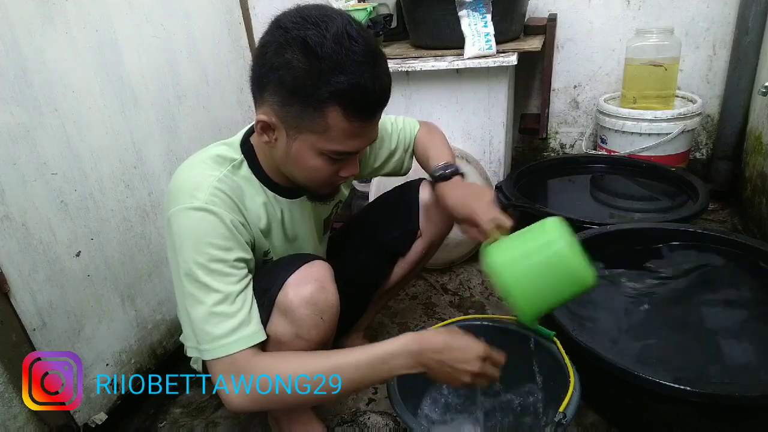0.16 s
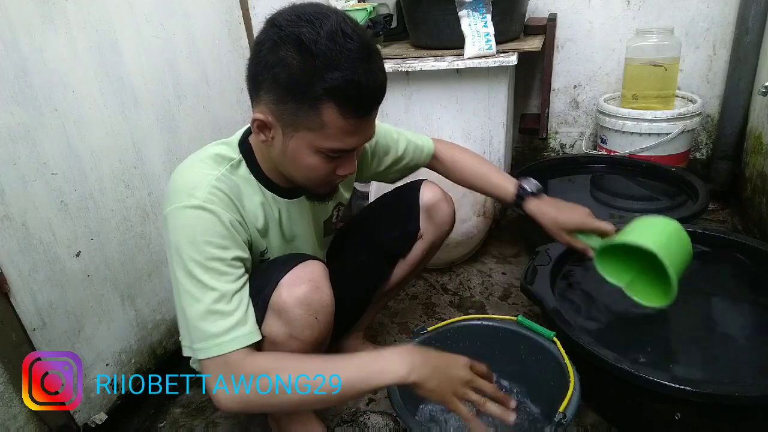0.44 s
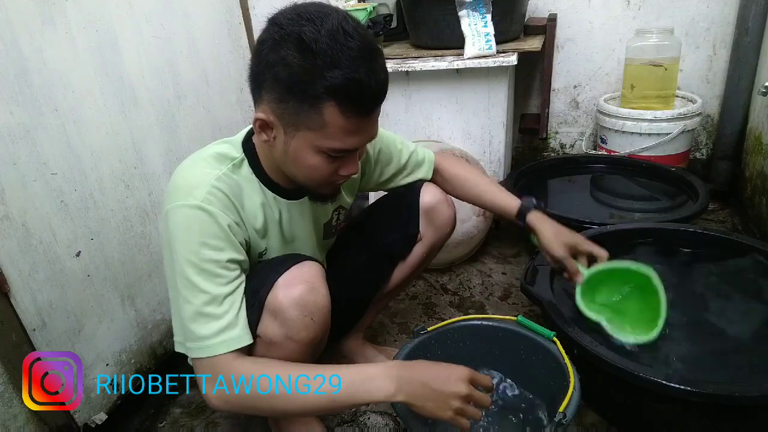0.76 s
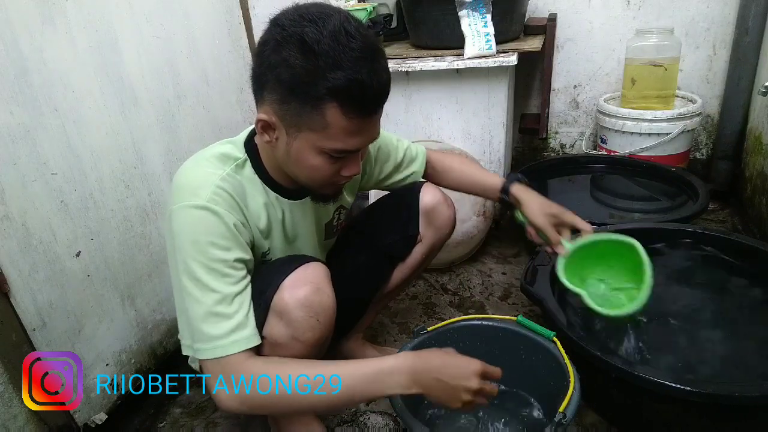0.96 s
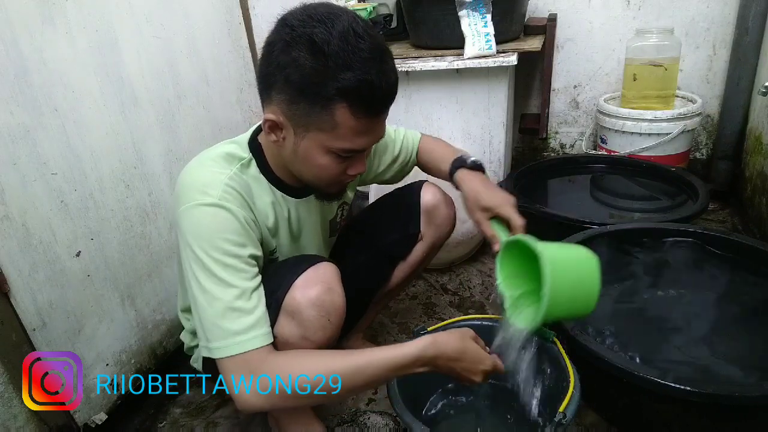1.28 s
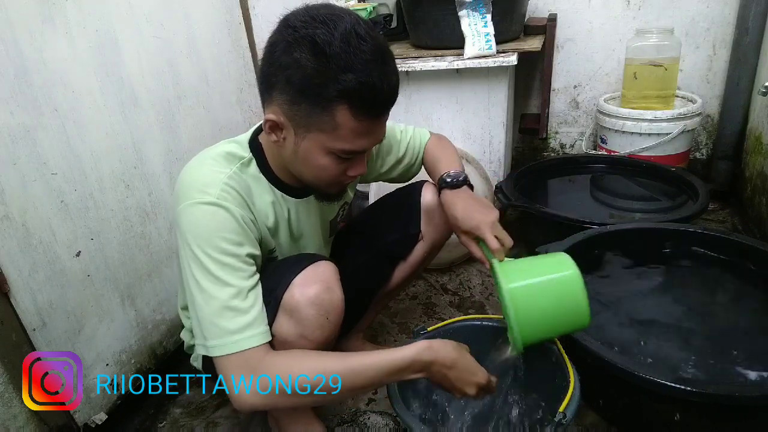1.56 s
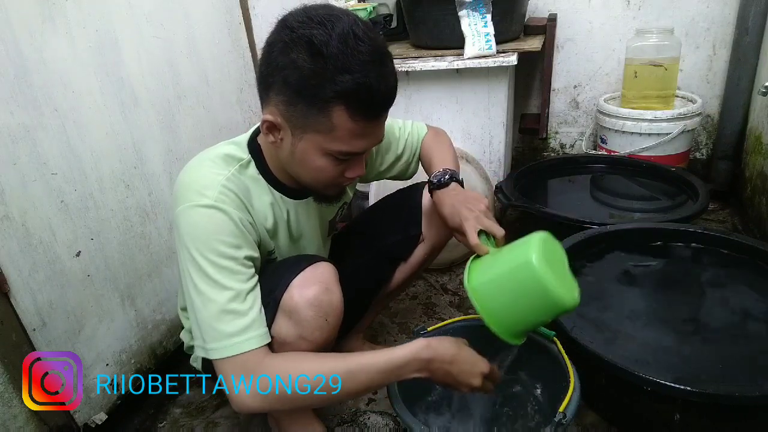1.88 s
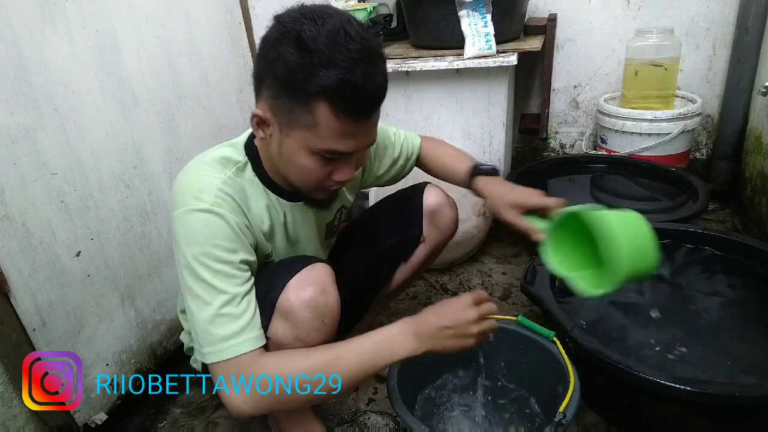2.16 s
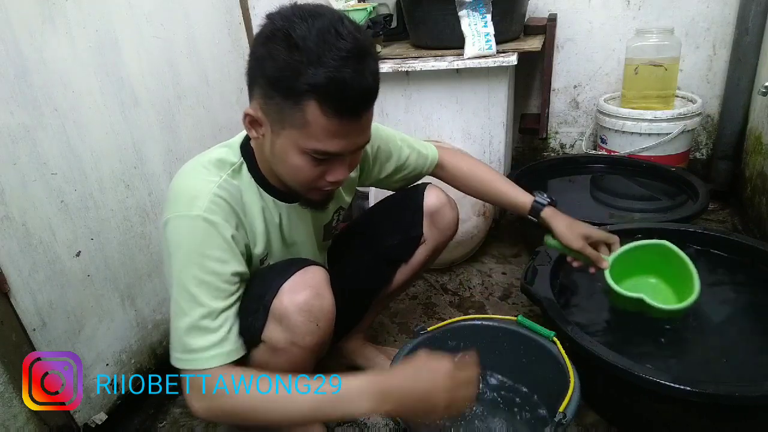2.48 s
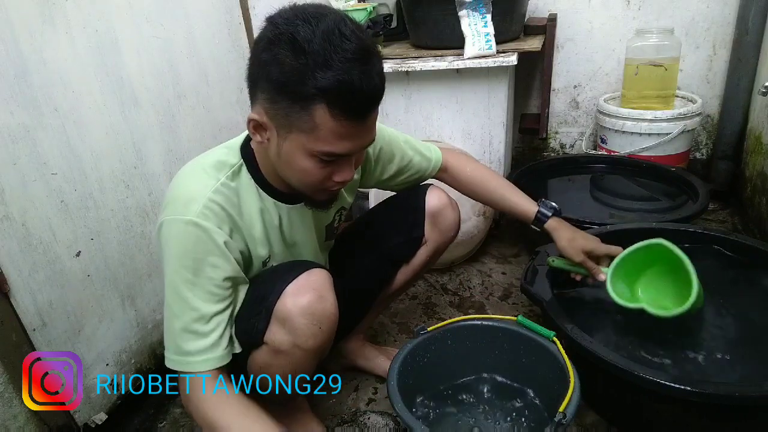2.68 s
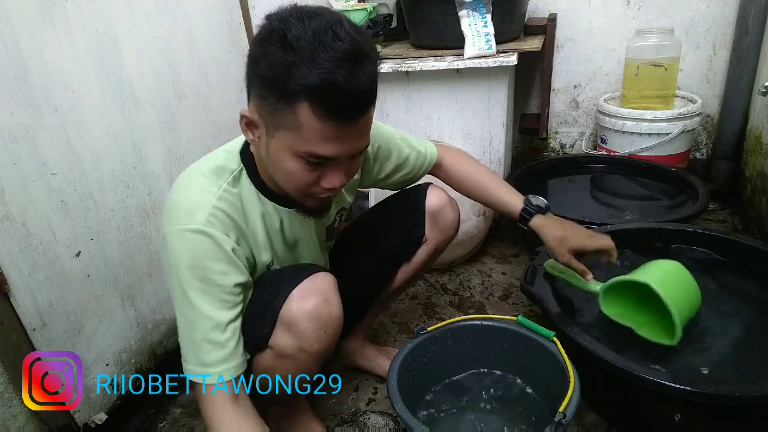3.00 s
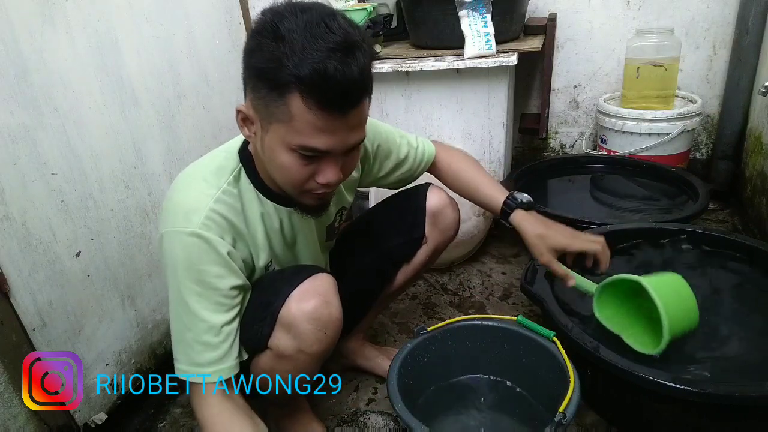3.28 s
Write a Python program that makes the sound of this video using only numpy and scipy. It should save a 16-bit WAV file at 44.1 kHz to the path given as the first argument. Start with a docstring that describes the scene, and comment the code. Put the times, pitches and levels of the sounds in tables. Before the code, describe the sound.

Water from a plastic dipper is already pouring into a bucket at 0 s, with a deep gurgle and splash fading by about 0.8 s. From 0.9 to 1.7 s come small splashes, plops and sharp plastic ticks. A second, slightly higher-pitched pour splashes from 1.8 to 2.6 s. Drips and clicks follow, then a loud click and hollow plop near 3.28 s. Close, short yard echoes, faint air and hum.

```python
"""A deep gurgle and splash open: a plastic dipper tips water into a bucket in a small walled yard.
A hand stirs and the dipper scoops from a large tub (splashes, plops, plastic ticks); a second pour follows.
At the end the dipper drops onto the tub water: a click and a loud hollow plop.
Water is a swarm of rising damped sines and clicks, plops are swelling sines with wall echoes,
ticks are noise cracks; all pass through the scattered echoes of the yard, over air noise and low hum."""
import sys
import numpy as np
from scipy import signal
from scipy.fft import rfft, irfft, next_fast_len
from scipy.io import wavfile

SR = 44100
rng = np.random.default_rng(int(sys.argv[2]) if len(sys.argv) > 2 else 0)


def master_out(mix):
    """Clip the mix to full scale and print it as 16-bit PCM to the path in sys.argv[1]."""
    frames = np.transpose(np.atleast_2d(mix))
    ceiling = np.clip(frames, -1, 1)
    pcm = np.round(ceiling * 32767).astype(np.int16)
    wavfile.write(sys.argv[1], SR, pcm)


N = 152145

# Parts of each pour: (time [s], gurgle level [dB], splash level [dB], spray level [dB])
POUR_ONE = [(0, -18.5, -27, -32), (.04, -31, -31.5, -42.5), (.25, -32, -32.5, -41), (.5, -35.5, -35.5, -42),
            (.58, -33.5, -38, -47), (.635, -55, -45, -43), (0.678, -50, -39.5, -42), (.74, -50, -49.5, -71),
            (.88, -74, -52.5, -55.5)]
POUR_TWO = [(1.805, -75, -73, -41.5), (1.83, -80, -37.5, -40), (1.885, -57, -29.5, -39.5),
            (1.97, -46, -30.5, -39.5), (2.03, -31.5, -31.5, -40), (2.1, -34.5, -35, -42),
            (2.39, -38.5, -37.5, -44.5), (2.53, -44, -39.5, -42.5), (2.62, -51, -50, -55),
            (2.78, -69, -52.5, -55)]
# Spectra of those parts: (frequency [Hz], relative density [dB per Hz])
GURGLE_SPECTRUM = [(100, -16), (160, -1.5), (300, -7), (405, 7), (560, -4.5), (780, -1.5), (1400, -13),
                   (2200, -11.5), (5000, -54)]
SPLASH_SPECTRUM = [(350, -9), (600, -12), (850, -6), (1500, 1.5), (2500, 4.5), (3400, 0), (5000, -8),
                   (7000, -18), (9000, -23), (14000, -36)]
SPRAY_SPECTRUM = [(3000, -24), (6500, -3.5), (8200, -10.5), (9700, 3.5), (12800, 5), (14000, -61)]
# Crisp drops: (frequency [Hz], relative density [dB per Hz])
SPATTER_SPECTRUM = [(500, -19), (1500, -9), (3000, 2), (5000, 16), (8000, -14), (10500, 11), (13500, -2)]
# Small splashes of hand and dipper:
# (time [s], level [dB], decay [s], centre [Hz], half-width near -6 dB [octaves])
SPLASHES = [(0.919, -36, 0.048, 2070, 1.02), (0.981, -38.5, 0.04, 2800, 0.77),
            (1.114, -41, 0.056, 2310, 1.14), (1.211, -38.5, 0.22, 1280, 0.75),
            (1.253, -24.5, 0.0056, 2090, 0.72), (1.302, -31, 0.036, 2430, 0.49),
            (1.343, -28, 0.011, 2200, 0.54), (1.405, -37.5, 0.12, 2190, 0.73), (1.42, -33, 0.074, 734, 0.3),
            (1.489, -37, 0.083, 2900, 0.99), (1.595, -42.5, 0.081, 990, 0.21),
            (1.66, -38.5, 0.024, 2310, 0.38), (1.817, -29, 0.015, 2550, 0.68),
            (1.998, -23.5, 0.037, 910, 0.49), (2.017, -26, 0.011, 1210, 1.1),
            (2.113, -26, 0.0092, 1800, 0.47), (2.405, -27, 0.01, 1700, 1.06),
            (2.514, -22, 0.0052, 2400, 0.73), (2.649, -30, 0.0086, 2210, 0.25),
            (2.79, -32.5, 0.019, 1710, 1.55), (3.08, -38, 0.015, 3720, 0.53),
            (3.153, -43, 0.0085, 5200, 0.15), (3.175, -36.5, 0.016, 850, 0.25),
            (3.237, -40.5, 0.034, 2030, 0.91), (3.284, -32.5, 0.012, 1120, 0.47)]
# Single ringing bubbles: (time [s], pitch [Hz], level [dB], decay [s])
BUBBLES = [(.012, 920, -35, 0.032), (.348, 695, -18, 0.0084), (0.711, 1032, -29, 0.024),
           (.738, 1046, -32, 0.0095), (0.765, 1600, -26, 0.0031), (0.919, 1750, -33, 0.0045),
           (1.255, 1960, -9.5, 0.0015), (1.305, 2725, -19, 0.0036), (1.348, 2520, -31, 0.0056),
           (1.4065, 5060, -22.5, 0.0024), (1.425, 990, -23.5, 0.0042), (1.44, 523, -25.5, 0.031),
           (1.453, 392, -30.5, 0.038), (1.445, 780, -31, 0.015), (1.491, 775, -22.5, 0.014),
           (1.505, 704, -34, 0.0087), (1.5515, 11950, -17.5, 0.0015), (1.5615, 12200, -32, 0.0013),
           (1.595, 943, -36, 0.032), (2.012, 753.6, -21.5, 0.03), (2.65, 1720, -37, 0.0039),
           (2.791, 1575, -31, .006)]
# Air trapped under the dipper: (time [s], pitch [Hz], level [dB])
PLOPS = [(.55, 436, -35), (0.641, 450, -35), (.978, 585, -46), (1.005, 593, -41.5), (1.11, 560, -31),
         (1.229, 627, -32), (1.393, 620, -32.5), (2.397, 455, -29), (2.651, 466, -40), (2.885, 668, -46),
         (2.945, 563, -46), (3.174, 500, -31), (3.284, 536, -12)]
# Walls round the tub: (delay [s], level against the first arrival [dB])
WALLS = [(.0083, 4), (.0185, 3), (.0222, 5.5), (.0365, -7), (.0497, -3), (.067, -14), (.084, -8.5),
         (.103, -10.5), (.143, -26)]
# Plastic dipper and drops:
# (time [s], level [dB], lower modes against top [dB], reverberation send [dB], time to peak [s])
TICKS = [(0.6736, -35, 11.5, -2.5, 0.00074), (0.9864, -29, -16, -3.5, 0.0014),
         (1.11, -44.5, 8.5, 1, 0.0011), (1.1249, -18.5, -16, -13, 0.001), (1.4059, -30, 9.5, -7, 0.0011),
         (1.5494, -21.5, -16, -14, .0007), (2.65, -30, -5, -14, 0.00068), (2.791, -31, -4, -9, 0.0015),
         (2.795, -15, -20, -17.5, 0.0012), (2.8857, -21.5, -1, -10.5, 0.00045),
         (3.2834, -6, -6, -9.5, 0.00089), (3.2877, -14, -12, -11, 0.00047)]
# Upper and lower modes of a tick: (frequency [Hz], relative density [dB per Hz])
TICK_TOP_SPECTRUM = [(4000, -4), (6300, -8), (8100, -11.5), (8800, -6), (9700, 8), (12600, 9.5),
                     (14000, -42)]
TICK_BODY_SPECTRUM = [(300, -5), (1000, -14), (2000, -3), (3700, 9.5), (5200, -1), (9000, -57)]
# Yard decay: (frequency [Hz], t60 [s])
YARD_T60 = [(200, 0.77), (1000, 0.13), (4000, 0.1763), (12000, .18)]
# Yard reverberation before each source's send: (frequency [Hz], gain [dB])
YARD_WET = [(150, -14.5), (500, -1), (1300, 5.5), (5000, 8.5), (12000, 8)]
# Outdoor air: (frequency [Hz], relative density [dB per Hz])
AIR_SPECTRUM = [(20, -36), (60, -2), (160, 3), (300, -2.5), (600, -9.5), (1200, -19.5), (2500, -17.5),
                (5000, -16.5), (8000, -30), (10500, -12.5), (13500, -25.5)]
# Hum bands: (centre [Hz], half-width at -6 dB [Hz], level before HUM_GAIN [dB])
HUM_BANDS = [(61, 10, -58), (94.3, 7.1, -58.5)]
# Wavering of the hum: (time [s], gain [dB])
HUM_GAIN = [(0, 6), (1.4, 3.5), (1.78, 9), (2.3, 2), (2.7, 8), (3.15, 10.5), (3.3, 0)]

BUBBLES_PER_S, BUBBLE_DECAY_CYCLES, BUBBLE_RISE = 4500, 7.9, 0.033
DROPS_PER_S, DROP_DB = 2500, 0
POUR_SPREAD_DB, SPLASH_SPREAD_DB = 3.3, 4.5
LUMPS_HZ, LUMPS_DB = 71, 1.5
FILL_RISE = 1.093  # pitch ratio: the fuller bucket gurgles higher in the second pour
SPATTER_PER_S, SPATTER_SPREAD_DB, SPATTER_DB, SPATTER_DECAY_S = 130, 2, -12, 0.00018
SPLASH_RISE_S, SPLASH_SPRAY_DB = 0.00066, -14.5
TRICKLE_PER_S, TRICKLE_DB, TRICKLE_SPREAD_DB = 110, -55, 2.5
PLOP_SWELL_S, PLOP_PHASE_RISE_PER_S = 0.0019, 0.29
ECHO_SMEAR = 0.0077  # added swell time per second of delay
POUR_WET_DB, SPLASH_WET_DB, PLOP_WET_DB, SPATTER_WET_DB = -1.5, -3.5, -10, 5.5
CHANNEL_LAG_S = 0.00014
AIR_DB = -48.5
EDGE_HZ = 13300


def pours():
    """The stream breaks into lumps and hits the bucket: deep bubbles, splash and spray."""
    hz = np.fft.rfftfreq(N, 1 / SR)
    lumps = evened(irfft(rfft(rng.standard_normal(N)) / (1 + (hz / LUMPS_HZ) ** 4), N))
    swarm = water(POUR_SPREAD_DB) * amp(LUMPS_DB * np.clip(lumps, -2, 2))
    out = np.zeros(N)
    for pour, rise in [(POUR_ONE, 1), (POUR_TWO, FILL_RISE)]:
        gurgle = [(hz * rise, db) for hz, db in GURGLE_SPECTRUM]
        for column, spectrum in enumerate([gurgle, SPLASH_SPECTRUM, SPRAY_SPECTRUM], 1):
            out += evened(coloured(swarm, spectrum)) * flow(pour, column)
    return out


def flow(pour, column):
    """Gain over time of one part of a pour, which trickles away after its end."""
    t, pour = np.arange(N) / SR, np.array(pour)
    start_s, end_s = pour[0, 0], pour[-1, 0]
    fade = np.exp(-np.maximum(t - end_s, 0) / 0.24) * (t >= start_s)
    return fade * amp(np.interp(t, pour[:, 0], pour[:, column]))


def water(spread_db, count=64):
    """A swarm of bubbles of all sizes and drop impacts, with equal power per Hz."""
    pitches = np.geomspace(200, 14000, count)
    shares = np.sqrt(pitches) / np.sqrt(pitches).sum()
    swarm = np.zeros(N)
    for hz, share in zip(pitches, shares):
        ring = bubble(hz * rng.uniform(1.0, 1.03), BUBBLE_DECAY_CYCLES / hz)
        band = signal.oaconvolve(clicks(BUBBLES_PER_S * share, spread_db), ring)[:N]
        swarm += np.sqrt(hz) * evened(band)  # log-spaced bands widen with hz
    drops = evened(clicks(DROPS_PER_S, spread_db))
    return evened(evened(swarm) + amp(DROP_DB) * drops)


def bubble(hz, decay_s):
    """A damped ring whose pitch rises as the bubble nears the surface."""
    t = np.arange(0, 6 * decay_s, 1 / SR)
    ring = np.sin(2 * np.pi * hz * t * (1 + BUBBLE_RISE * t / decay_s / 4))
    return ring * np.exp(-t / decay_s) * (1 - np.exp(-t * hz))


def clicks(per_s, spread_db):
    """Random impacts, a few of them large."""
    size = amp(spread_db * np.minimum(rng.exponential(1, N), 4.5))
    return size * rng.choice([-1, 1], N) * (rng.random(N) < per_s / SR)


def spatter(count=12):
    """Single crisp drops thrown up by the splash: decaying noise grains that follow its level."""
    t = np.arange(SR // 200) / SR
    drops = np.zeros(N)
    for _ in range(count):
        grain = np.exp(-t / SPATTER_DECAY_S) * rng.standard_normal(len(t))
        drops += signal.oaconvolve(clicks(SPATTER_PER_S / count, SPATTER_SPREAD_DB), grain)[:N]
    splash_gain = flow(POUR_ONE, 2) + flow(POUR_TWO, 2)
    return amp(SPATTER_DB) * evened(coloured(drops, SPATTER_SPECTRUM)) * splash_gain


def splashes():
    """Short bursts of bubbles round one size, with a little spray; single bubbles ring alone."""
    swarm, out = water(SPLASH_SPREAD_DB), np.zeros(N)
    spray = evened(coloured(swarm, SPRAY_SPECTRUM))
    size = next_fast_len(N)
    spectrum, octave = rfft(swarm, size), np.log2(np.fft.rfftfreq(size, 1 / SR) + 1)
    t = np.arange(SR // 3) / SR
    for s, db, decay_s, hz, width in SPLASHES:
        start = rng.integers(0, N - len(t))
        cut = slice(start, start + len(t))
        band = 1 / (1 + ((octave - np.log2(hz)) / width / 2) ** 2) ** 3
        body = evened(irfft(spectrum * band, size)[cut])
        shape = np.minimum(t / SPLASH_RISE_S, 1) * np.exp(-t / decay_s)
        burst = (body + amp(SPLASH_SPRAY_DB) * width * spray[cut]) * shape
        add(out, s, amp(db) * evened(burst) * np.sqrt(np.mean(shape ** 2)))
    for s, hz, db, decay_s in BUBBLES:
        add(out, s, amp(db) * bubble(hz, decay_s))
    return out


def trickle(count=24):
    """Stray drips from hand and dipper, each ringing one small bubble."""
    drips = np.zeros(N)
    for hz in np.geomspace(500, 4500, count):
        ring = evened(bubble(hz, BUBBLE_DECAY_CYCLES / hz)) * np.sqrt(hz)
        drips += signal.oaconvolve(clicks(TRICKLE_PER_S / count, TRICKLE_SPREAD_DB), ring)[:N]
    return amp(TRICKLE_DB) * evened(drips)


def plops():
    """A pocket of air swells and rings for a few cycles; the near walls repeat it, later ones more drawn out."""
    t, out = np.arange(SR // 20) / SR, np.zeros(N)
    for s, hz, db in PLOPS:
        ring = np.sin(2 * np.pi * hz * t * (1 + PLOP_PHASE_RISE_PER_S * t))
        for delay_s, wall_db in [(0.0038, 0)] + WALLS:  # first arrival, then walls
            u = t / (PLOP_SWELL_S + ECHO_SMEAR * delay_s)
            swell = (u / 2) ** 2 * np.exp(2 - u)  # peaks at u = 2
            add(out, s + delay_s, amp(db + wall_db) * swell * ring)
    return out


def ticks():
    """Very short cracks, mostly high treble: the direct sound and the part that goes round the yard."""
    t, out, send = np.arange(SR // 25) / SR, np.zeros(N), np.zeros(N)
    for s, db, body_db, wet_db, peak_s in TICKS:
        top, body = rng.standard_normal((2, len(t)))
        crack = evened(coloured(top, TICK_TOP_SPECTRUM))
        crack += amp(body_db) * evened(coloured(body, TICK_BODY_SPECTRUM))
        crack *= amp(db) * t / peak_s * np.exp(1 - t / peak_s)
        add(out, s, crack)
        add(send, s, amp(wet_db) * crack)
    return out, send


def yard(x, send):
    """Direct sound reaches the right channel first; scattered echoes differ in each channel."""
    n = SR // 2
    signs = rng.choice([-1, 1], (2, n))
    taps = signs * (rng.random((2, n)) < 0.12) * (np.arange(n) > 0.002 * SR)
    hz, t, z = signal.stft(taps, SR, nperseg=256)
    decay = amp(-60 * t / read(YARD_T60, hz)[:, None])
    decay /= np.sqrt(np.mean(decay ** 2, 1, keepdims=True))
    tail = signal.istft(z * decay, SR, nperseg=256)[1] / np.linalg.norm(taps, axis=1, keepdims=True)
    wet = signal.fftconvolve(send[None], coloured(tail, YARD_WET), axes=1)[:, :N]
    at = np.arange(N)
    left = np.interp(at - round(CHANNEL_LAG_S * SR), at, x)
    return (np.array([left, x]) + wet) / np.sqrt(2)


def background():
    """Outdoor air as partly shared stereo noise, and a wavering low hum of narrow noise bands."""
    noise = rng.standard_normal((4, N))
    air = evened(coloured(noise[:2] + 1.13 * noise[2], AIR_SPECTRUM))
    hz, spectrum = np.fft.rfftfreq(N, 1 / SR), rfft(noise[3])
    hum = np.zeros(N)
    for centre_hz, width_hz, db in HUM_BANDS:
        hum += amp(db) * evened(irfft(spectrum / (1 + ((hz - centre_hz) / width_hz) ** 4), N))
    waver = amp(np.interp(np.arange(N) / SR, *np.transpose(HUM_GAIN)))
    return amp(AIR_DB) * air + hum * waver


def amp(db):
    """Decibels to gain."""
    return 10 ** (np.asarray(db) / 20)


def evened(x):
    """Scales to rms 1."""
    return x / np.sqrt(np.mean(x ** 2) + 1e-20)


def read(points, hz):
    """Reads a spectrum on a log-frequency axis."""
    f, value = np.transpose(points)
    return np.interp(np.log(hz + 1), np.log(f + 1), value)


def add(mix, s, sound):
    """Adds a sound at a time in seconds."""
    part = mix[max(round(s * SR), 0):][:len(sound)]
    part += sound[:len(part)]


def coloured(x, points):
    """Filters by a spectrum."""
    n = x.shape[-1]
    size = next_fast_len(n + 4096)
    gain = amp(read(points, np.fft.rfftfreq(size, 1 / SR)))
    return irfft(rfft(x, size) * gain, size)[..., :n]


def scene():
    """Each source has its own scatter of yard echoes; splashes and trickle share one."""
    out = background() + yard(*ticks())
    sources = [(pours(), POUR_WET_DB), (splashes() + trickle(), SPLASH_WET_DB),
               (plops(), PLOP_WET_DB), (spatter(), SPATTER_WET_DB)]
    for sound, wet_db in sources:
        out += yard(sound, amp(wet_db) * sound)
    return out


def record(dry):
    """The band limit of the recorder: a linear-phase low-pass."""
    low_pass = signal.firwin(301, EDGE_HZ, window=("kaiser", 8), fs=SR)
    return signal.oaconvolve(dry, low_pass[None], "same")


dry = scene()
out = record(dry)
master_out(out)
```